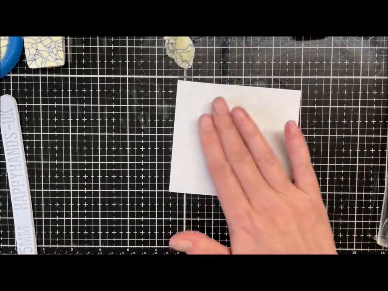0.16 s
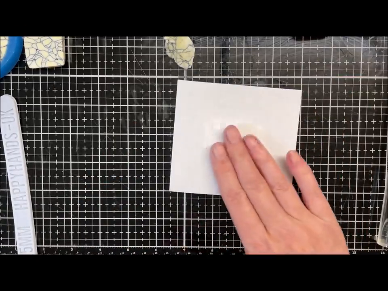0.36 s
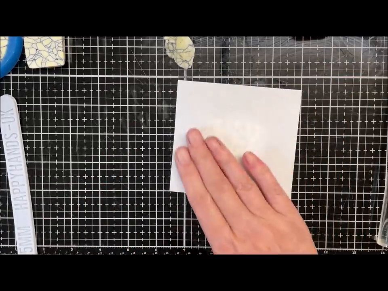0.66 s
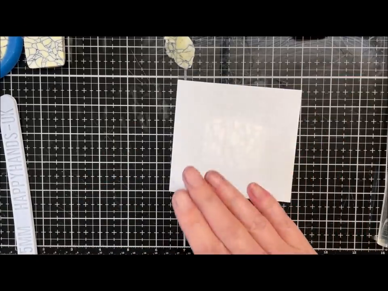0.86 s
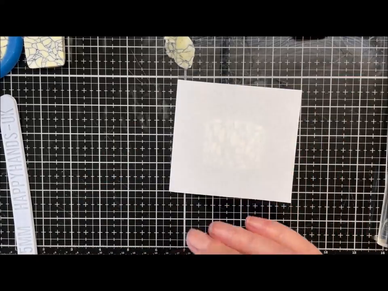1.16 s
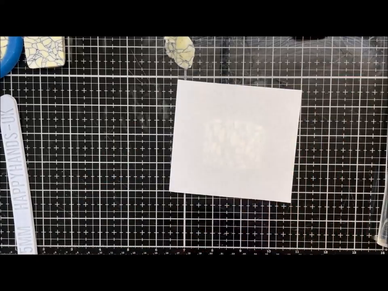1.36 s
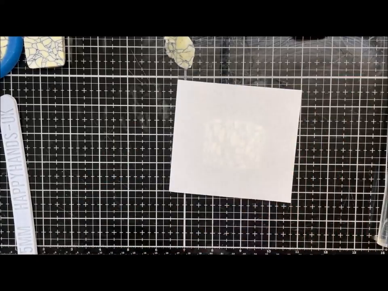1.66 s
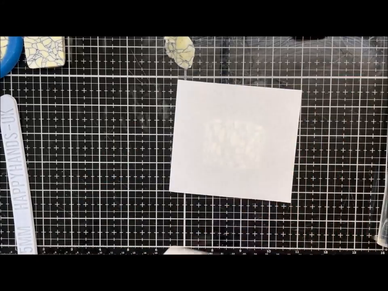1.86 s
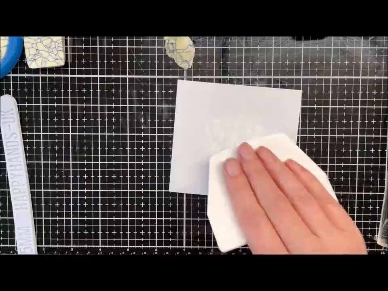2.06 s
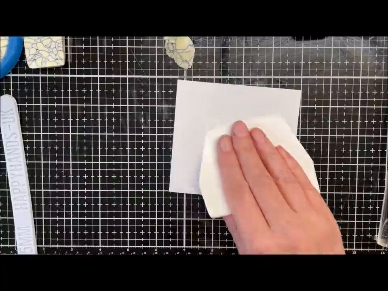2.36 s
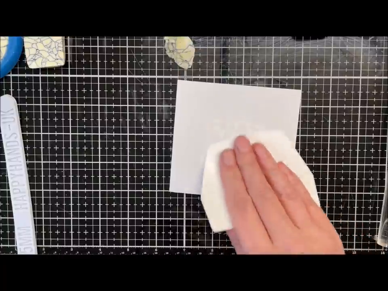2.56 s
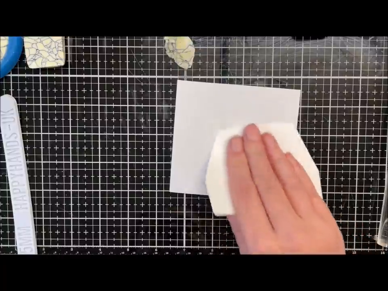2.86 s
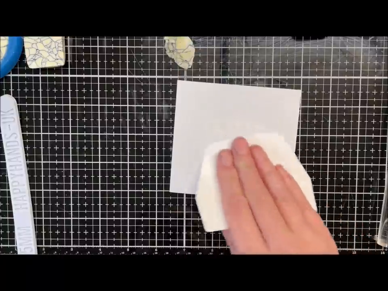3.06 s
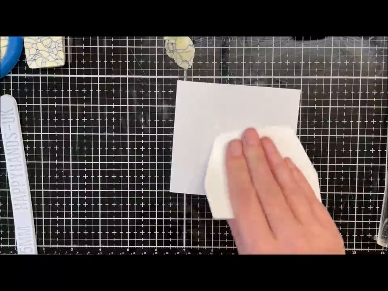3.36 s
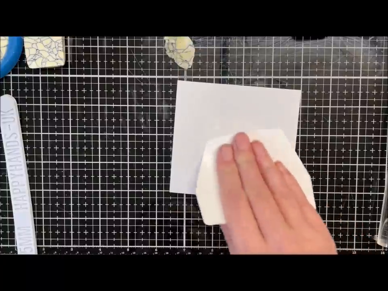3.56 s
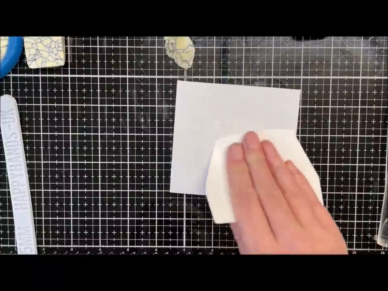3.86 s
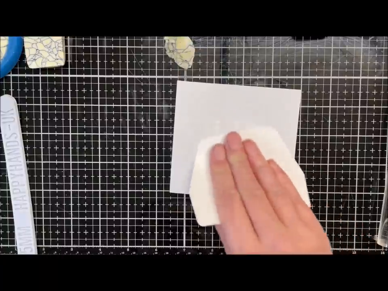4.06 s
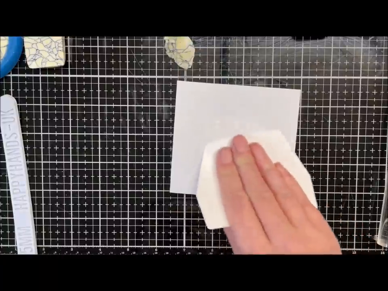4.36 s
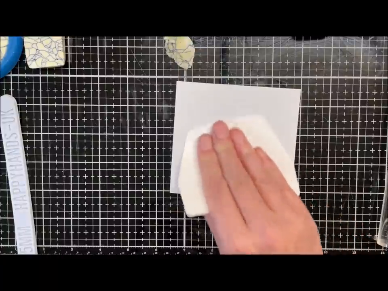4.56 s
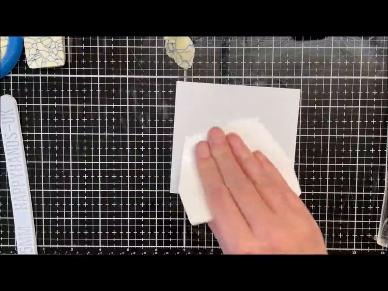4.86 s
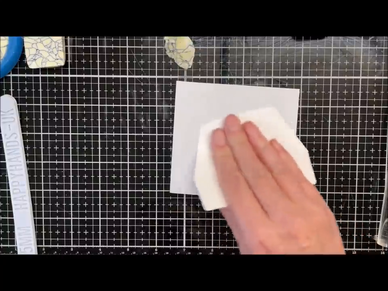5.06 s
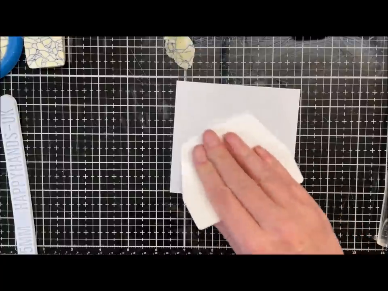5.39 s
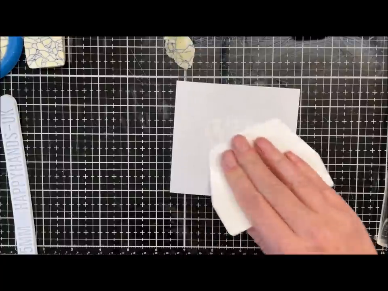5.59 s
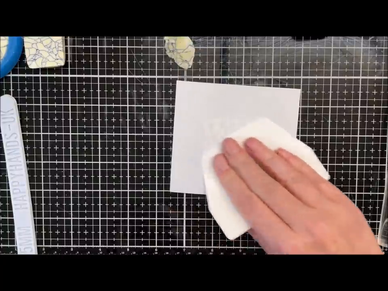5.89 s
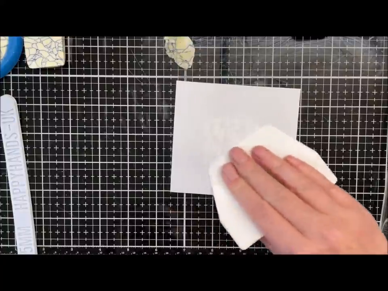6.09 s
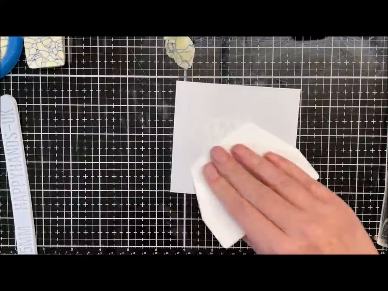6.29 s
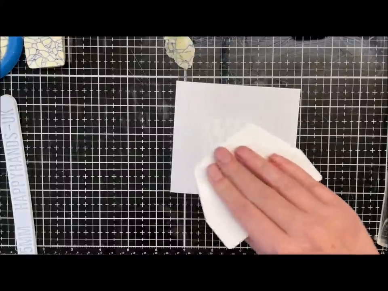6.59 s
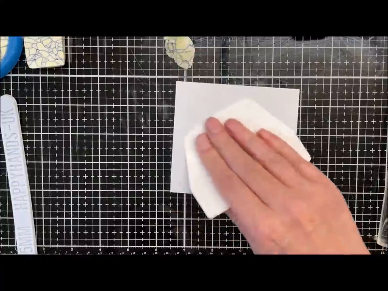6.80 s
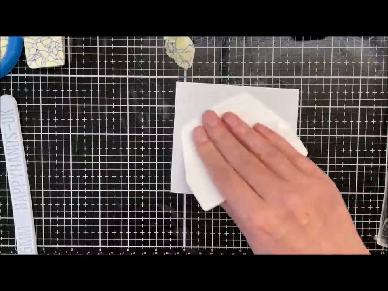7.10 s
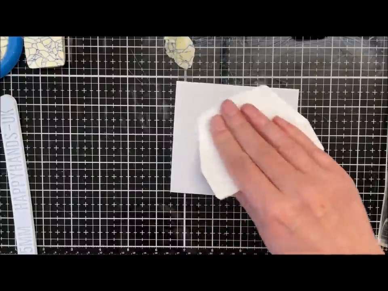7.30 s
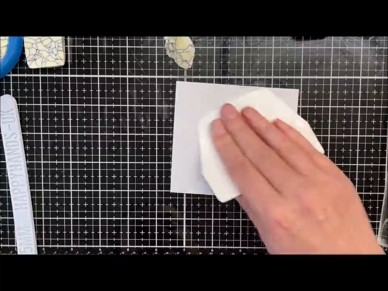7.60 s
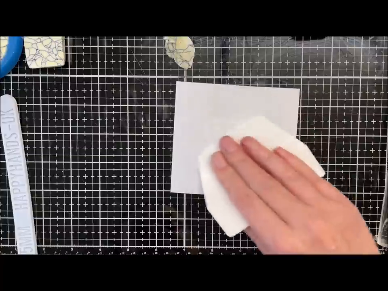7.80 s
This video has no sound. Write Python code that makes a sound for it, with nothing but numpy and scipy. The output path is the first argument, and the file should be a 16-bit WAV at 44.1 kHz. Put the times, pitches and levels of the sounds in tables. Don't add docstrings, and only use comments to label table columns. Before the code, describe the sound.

Bare fingers brush paper, slide off onto a mat, then folded tissue rubs the sheet in hissing circles and quick squeaky wipes, with desk knocks.

```python
import sys
import numpy as np
from scipy import signal
from scipy.fft import rfft, irfft, next_fast_len
from scipy.io import wavfile
from scipy.ndimage import uniform_filter1d

SR = 44100
rng = np.random.default_rng(int(sys.argv[2]) if len(sys.argv) > 2 else 0)


def wav_record(signal):
    frames = np.transpose(np.atleast_2d(signal))
    bounded = np.clip(frames, -1, 1)
    quanta = np.round(bounded * 32767).astype(np.int16)
    wavfile.write(sys.argv[1], SR, quanta)


def undo_db(level):
    steps = np.asarray(level, float) / 20
    return 10 ** steps


N = 350154


def evened(x):
    return x / np.sqrt(np.mean(x ** 2) + 1e-20)


def drifting(size):
    once = uniform_filter1d(rng.standard_normal(N), size=size)
    return evened(uniform_filter1d(once, size=size))


def coloured(x, points):
    size = next_fast_len(len(x))
    hz, db = np.transpose(points)
    log_hz = np.log(np.fft.rfftfreq(size, 1 / SR) + 1)
    shape_db = np.interp(log_hz, np.log(hz + 1), db, left=-100, right=-100)
    return evened(irfft(rfft(x, size) * undo_db(shape_db), size)[:len(x)])


def resonate(x, hz, width):
    turn = np.exp(2j * np.pi * np.cumsum(hz * np.ones(len(x))) / SR)
    r = np.exp(-np.pi * width / SR)
    smooth = signal.lfilter([(1 - r) ** 2], [1, -2 * r, r * r], x / turn + 1e-18)
    return 2 * (turn * smooth).real


def ring(x, modes, drift=0.):
    return sum(undo_db(db) * evened(resonate(x, hz * (1 + drift), width)) for hz, width, db in modes)


def level_curve(rows):
    s, db = np.transpose(rows)
    t = np.arange(N) / SR
    outside_s = np.maximum(s[0] - t, 0) + np.maximum(t - s[-1], 0)
    return undo_db(np.interp(t, s, db) - 1000 * outside_s)


def bumps(rows):
    t, out = np.arange(N) / SR, np.zeros(N)
    for s, length, db in rows:
        at = slice(max(round((s - length / 2) * SR), 0), round((s + length / 2) * SR))
        out[at] += undo_db(db) * np.cos(np.pi * (t[at] - s) / length) ** 2
    return out


def room():
    # hz, db_per_hz
    tone_spectrum = [(53, -15.5), (90, -4.5), (168, -5.5), (223, -16.5), (308, -18), (343, -18.5),
                     (550, -21), (964, -27.5), (1030, -25.5), (1200, -26), (2100, -30), (2330, -32.5),
                     (15600, -40)]
    # hz, width_hz, level_db
    fan_band = [(166.9, 17.5, -71.5)]
    # hz, width_hz, level_db
    hum_band = [(119.7, 12.7, -71.5)]
    # time_s, level_db
    swell = [
        (0, 0),
        (2.5, 6.5),
        (3.5, 6.5),
        (4.4, -12),
        (5.4, -1),
        (7.94, -8),
    ]
    fan_hz, fan_db = 300.5, -76
    waver = evened(resonate(rng.standard_normal(N), fan_hz, width=9.5))
    tone = undo_db(fan_db) * (np.sin(2 * np.pi * fan_hz * np.arange(N) / SR) + 0.25 * waver)
    air = rng.standard_normal(N)
    bands = level_curve(swell) * ring(air, fan_band) + ring(air, hum_band)
    return undo_db(-65) * coloured(rng.standard_normal(N), tone_spectrum) + bands + tone


def building_drone():
    # middle_s, length_s, level_db
    swells = [(.37, 0.76, -50), (1.1, 1.3, -55), (1.9, 1.34, -51), (2.6, 0.67, -59), (3.5, 1.4, -53),
              (4.2, 1.05, -53), (5.1, 1.2, -57), (6.0, 1.0, -60), (6.95, 1.8, -58)]
    hz, floor_db = 44.48, -74.5
    fuzz = evened(resonate(rng.standard_normal(N), hz, width=10.6))
    tone = np.sin(2 * np.pi * hz * np.arange(N) / SR)
    return (undo_db(floor_db) + bumps(swells)) * (tone + 0.28 * fuzz)


def stand():
    # hz, width_hz, level_db
    tremor = [(7.34, 3.13, -44.5), (17.39, 2.92, -49), (79.4, 24, -67)]
    # start_s, peak_db, swing_hz, length_s
    sways = [
        (1.863, -26.5, 8, 0.856),
        (3.018, -19.5, 7.5, 0.6),
        (4.575, -27.5, 7.6, .5),
        (5.7, -36, 7.9, 0.45),
    ]
    out, t = ring(rng.standard_normal(N), tremor), np.arange(N) / SR
    for s, db, hz, length in sways:
        u = np.clip((t - s) / length, 0, 1)
        swing = np.minimum(u / 0.082, 1) * undo_db(-7 * u) * np.minimum((1 - u) / 0.21, 1)
        out -= undo_db(db) * swing * np.sin(2 * np.pi * hz * (t - s))
    return out


def desk():
    # middle_s, length_s, rumble_db
    leans = [(1.1, 2.3, -74), (1.77, 0.35, -59), (2.45, 0.61, -61.5), (2.9, 0.5, -54), (3.14, 0.14, -49.5),
             (4.6, 0.13, -51.5), (4.82, 0.17, -52), (5.2, 0.36, -59.5), (5.74, 0.4, -59), (6.01, 0.3, -51),
             (6.6, 1.15, -62.5), (6.99, 0.26, -63), (7.37, 0.13, -74), (7.58, 0.19, -60.5)]
    # hz, db_per_hz
    rumble_spectrum = [(16, -37), (28, -9), (38, -4), (92, -22), (160, -28.5), (210, -46.5), (350, -120)]
    # hz, width_hz, level_db
    boom = [(327, 88, 2.5), (371, 64, 2), (460, 130, -2), (630, 390, 0), (1020, 710, -5)]
    # start_s, length_s, boom_db, fade_db, rise_s
    drags = [
        (1.604, 0.68, -66.5, -1.5, 0.017),
        (3.12, 0.47, -57.5, -30, 0.012),
        (3.853, 0.67, -60, -5.5, 0.092),
    ]
    t = np.arange(N) / SR
    pressure = undo_db(-67.5) + bumps(leans)
    rumble = undo_db(4.5) * pressure * coloured(rng.standard_normal(N), rumble_spectrum)
    drag = np.zeros(N)
    for s, length, db, fade_db, rise in drags:
        gate = np.clip(np.minimum(t - s, s + length - t) / rise, 0, 1)
        drag += undo_db(db + fade_db * (t - s) / length) * gate
    return rumble + drag * evened(ring(rng.standard_normal(N), boom))


def knocks():
    # start_s, tick_db, thud_db, thud_hz, thud_t60_s
    blows = [(1.05, -57, -54, 197, 0.052), (1.4725, -50, -39.5, 320, 0.054),
             (1.618, -54, -45.5, 332, 0.038), (1.774, -73, -52.5, 171, 0.14),
             (1.821, -68, -47.5, 170, 0.08), (1.905, -66, -52, 200, 0.036), (2.425, -62, -47, 194, 0.082),
             (2.8, -75, -53, 250, 0.13), (2.94, -55, -47.5, 267, 0.045), (3.012, -50, -47, 317, 0.049),
             (3.1282, -34.5, -29, 126, 0.023), (3.541, -72, -48.5, 203, 0.033),
             (4.578, -69, -52.5, 141, 0.22), (5.959, -68, -52, 149, 0.063), (7.459, -55, -54, 604, .04)]
    # hz, level_db, t60_s
    tick_modes = [(712, 0.5, 0.055), (1055, 7, 0.026), (1240, 8.5, 0.01), (1470, -5, 0.05),
                  (2100, 10, 0.012), (2700, 1, 0.01)]
    length = 6000
    out, t = np.zeros(N + length), np.arange(length) / SR
    hz, db, t60 = np.transpose(tick_modes)[:, :, None]
    soft = 1 - np.exp(-t / 0.00025)
    modes = undo_db(db - 60 * t / t60) * np.sin(2 * np.pi * hz * t) * soft
    modes = signal.lfilter(*signal.butter(2, 560, "highpass", fs=SR), modes)
    uneven = undo_db(0.87 * rng.standard_normal((len(blows), len(tick_modes))))
    noise = rng.standard_normal((len(blows), length))
    puffs = evened(signal.lfilter(*signal.butter(2, [110, 400], "bandpass", fs=SR), noise))
    for (s, tick_db, thud_db, thud_hz, thud_t60), share, puff in zip(blows, uneven, puffs):
        push = undo_db(thud_db - 60 * t / thud_t60) * (1 - np.exp(-t / 0.0011))
        thud = push * (np.sin(2 * np.pi * thud_hz * t) + 0.38 * puff)
        out[round(s * SR):][:length] -= thud + undo_db(tick_db - 12) * (share @ modes)
    return out[:N]


def snaps():
    # start_s, peak_db, hz
    crisp = [(1.5948, -56, 1680), (1.6084, -57, 1630), (1.6192, -55, 1200), (1.7744, -61, 1600),
             (1.822, -57, 2890), (1.9011, -54.5, 1280), (2.222, -59, 1200), (2.2338, -49, 1490),
             (2.3955, -61, 1230), (2.4102, -57, 1320), (7.4589, -40.5, 3050)]
    length, t60_s, trim_db = 1500, .016, -1
    out, t = np.zeros(N + length), np.arange(length) / SR
    for (s, db, hz), crackle in zip(crisp, rng.standard_normal((len(crisp), length))):
        burst = np.sin(2 * np.pi * hz * t) + 0.49 * evened(resonate(crackle, 1.08 * hz, width=2500))
        out[round(s * SR):][:length] += undo_db(db + trim_db - 60 * t / t60_s) * burst
    return out[:N]


def grit(grain_db, flicker_db, patchy_db):
    clicks = rng.standard_normal(N) * undo_db(grain_db * np.minimum(rng.exponential(1, N), 5))
    z = signal.stft(clicks * undo_db(flicker_db * drifting(400)), nperseg=512)[2]
    patches = uniform_filter1d(rng.standard_normal(z.shape), size=6, axis=0)
    patches = uniform_filter1d(patches, size=6, axis=1)
    return evened(signal.istft(z * undo_db(patchy_db * evened(patches)), nperseg=512)[1][:N])


def rub(hiss_gain, ring_gain, colour, modes, slips):
    return hiss_gain * coloured(slips, colour) + ring_gain * evened(ring(slips, modes))


def squeaks():
    # start_s, length_s, hz, level_db
    pocket = [(1.588, 0.037, 1640, -65), (1.616, .01, 2780, -67), (1.625, 0.0093, 2450, -73),
              (1.596, .03, 1200, -68), (1.474, 0.016, 1520, -63), (2.277, 0.036, 1530, -64),
              (2.4, .03, 2770, -69), (1.618, 0.0076, 3120, -66), (2.232, 0.018, 1420, -65),
              (2.74, 0.06, 4020, -67), (2.796, .066, 3700, -63), (2.929, 0.042, 510, -63.5),
              (3.025, .086, 3650, -64), (3.285, 0.1, 3840, -65), (3.524, 0.11, 4130, -66),
              (3.77, 0.082, 4170, -71), (4.052, .046, 4200, -71), (4.391, 0.03, 4300, -61),
              (4.59, .12, 4300, -59), (4.903, 0.046, 4230, -56.5), (4.904, 0.045, 3030, -65),
              (4.905, 0.01, 2460, -52), (5.19, 0.043, 3600, -67), (7.438, 0.19, 5500, -67.5),
              (7.454, .006, 3100, -60)]
    # start_s, length_s, hz, level_db
    thumps = [(.6, 0.076, 200, -68.5), (2.408, 0.047, 420, -67.5), (2.408, .04, 550, -71),
              (2.72, 0.12, 200, -65.5), (4.558, 0.055, 250, -66), (4.56, 0.072, 616, -70),
              (4.795, .06, 225, -68), (5.936, .05, 477, -69), (5.936, .05, 650, -70.5),
              (6.22, 0.057, 250, -71.5), (7.08, .06, 303, -68), (7.394, 0.065, 215, -68)]
    # start_s, length_s, hz, level_db
    streaks = [(.685, 0.03, 1900, -60), (.72, .036, 1880, -65.5), (1.1, .026, 1200, -65),
               (1.102, .022, 1750, -62.5), (1.1, .03, 3180, -70), (1.11, 0.032, 785, -60.5),
               (1.128, .045, 1620, -69), (1.158, .045, 786, -64), (1.172, 0.048, 1160, -62.5),
               (1.165, 0.066, 3170, -70), (1.198, 0.016, 3600, -69), (1.192, .025, 3900, -69)]
    # start_s, length_s, hz, level_db, end_over_start_pitch
    glides = [(2.399, 0.062, 493, -68, 1.72), (4.642, 0.041, 3000, -59, 1.3),
              (6.128, 0.056, 2550, -64.5, 1.14), (6.82, 0.037, 2670, -61.5, 1.55),
              (7.05, .11, 3000, -62.5, 1.28), (7.135, 0.17, 2900, -60, 1.57), (7.163, 0.13, 2130, -66, 1.3),
              (7.388, 0.034, 2900, -60.5, 1.55), (7.44, .12, 3240, -58.5, 0.73),
              (7.486, 0.088, 2980, -56.5, 1.45), (7.68, 0.032, 3050, -60, 1.4),
              (7.724, 0.12, 2900, -62, 1.2), (7.804, .055, 3300, -61.5, 1.3)]
    out, slips = np.zeros(N), grit(grain_db=3.5, flicker_db=2.5, patchy_db=1.0)
    events = [(*r, 1, .17) for r in pocket + thumps]
    events += [(*r, 1, .05) for r in streaks]
    events += [(*r, .26) for r in glides]
    for s, length, hz, db, glide, width in events:
        at = slice(round(s * SR), round((s + length) * SR))
        u = np.linspace(0, 1, len(out[at]))
        shape = np.minimum(6 * u, 1) * np.minimum(3 * (1 - u), 1)
        out[at] += undo_db(db) * shape * evened(resonate(slips[at], hz * (1 + (glide - 1) * u), width * hz))
    return out


def fingers(slips):
    # time_s, level_db
    pressure = [
        (0.0, -66.5),
        (0.098, -69),
        (0.212, -64.5),
        (0.344, -63.5),
        (0.51, -70),
        (0.706, -60),
        (0.77, -60.5),
        (0.828, -71),
        (0.87, -93),
    ]
    # hz, db_per_hz
    skin = [(290, -20), (500, -16), (612, -33), (716, -20.5), (1240, -18.5), (1650, -24), (1850, -19),
            (2500, -15), (2850, -15.5), (5770, -13), (15600, -18.5)]
    # hz, width_hz, level_db
    modes = [(1820, 660, 2.5), (1490, 200, -2)]
    touch = level_curve(pressure)
    return rub(undo_db(1.0) * touch, undo_db(-11.5) * touch, skin, modes, slips)


def slide_off():
    # middle_s, length_s, hiss_db
    catches = [
        (1.056, .04, -72),
        (1.106, 0.054, -60.5),
        (1.155, 0.2, -62.5),
        (1.203, 0.048, -61.5),
        (1.24, 0.083, -73.5),
    ]
    # middle_s, length_s, ring_db
    bows = [
        (1.165, 0.18, -61),
    ]
    # hz, db_per_hz
    mat = [(290, -17), (500, -16), (569, -34), (770, -13), (889, -11), (1150, -13), (1350, -11),
           (3150, -15), (15600, -27.5)]
    # hz, width_hz, level_db
    modes = [(790, 73, 2.5), (1170, 78, 7), (1670, 150, -7), (2660, 210, -13), (3100, 200, -2)]
    slips = grit(grain_db=3.0, flicker_db=1.5, patchy_db=1.0)
    return rub(undo_db(1.0) * bumps(catches), undo_db(-5) * bumps(bows), mat, modes, slips)


def folding(slips):
    # middle_s, length_s, level_db
    folds = [
        (1.48, 0.089, -75.5),
        (1.59, 0.29, -73),
        (1.63, 0.041, -78),
        (1.78, 0.078, -69.5),
        (1.83, 0.095, -72.5),
        (1.908, 0.066, -71),
        (2.03, 0.44, -77),
        (2.228, 0.094, -75.5),
    ]
    # hz, db_per_hz
    crease = [(290, -36), (500, -7), (1060, -8), (1390, -23), (1650, -7), (1820, -13), (3060, -13.5),
              (4580, -19), (15600, -27)]
    # hz, width_hz, level_db
    modes = [(1650, 490, 5), (1200, 100, -5)]
    creases = bumps(folds)
    return rub(undo_db(3.0) * creases, undo_db(-17) * creases, crease, modes, slips)


def tissue(slips):
    # middle_s, length_s, speed_db
    strokes = [(2.307, 0.1, -74), (2.49, 0.2, -73.5), (2.606, 0.14, -68), (2.75, 0.21, -75.5),
               (2.87, 0.38, -69), (3.03, 0.25, -74.5), (3.14, 0.22, -71), (3.283, 0.14, -71),
               (3.39, .15, -69), (3.49, 0.18, -69.5), (3.67, 0.41, -72.5), (3.8, 0.12, -77),
               (3.92, 0.28, -71), (4.15, 0.47, -73), (4.314, 0.1, -74), (4.45, 0.14, -72.5),
               (4.673, 0.45, -69), (4.915, 0.5, -73),
               (5.056, 0.14, -70), (5.205, 0.21, -68.5), (5.325, 0.094, -69), (5.488, 0.21, -72),
             (5.618, 0.12, -68), (5.778, 0.19, -71), (5.914, 0.2, -74), (6.045, 0.15, -71),
             (6.172, 0.095, -71), (6.316, 0.23, -76), (6.455, 0.19, -78), (6.603, 0.15, -71),
             (6.706, 0.15, -74.5), (6.842, 0.2, -72), (7.02, 0.26, -71.5), (7.177, 0.27, -72),
             (7.33, 0.27, -73.5), (7.489, 0.16, -66.5), (7.606, 0.22, -69.5), (7.746, 0.21, -69.5),
             (7.92, 0.4, -67)]
    # middle_s, hiss_db, ring_db
    pushes = [(2.26, -90, -66.5), (2.8, -86, -88), (3.05, -67, -80), (3.33, -73, -83), (3.596, -67, -77),
              (3.845, -70.5, -92), (4.069, -66.5, -86), (4.374, -68.5, -84), (4.66, -72, -72),
              (4.92, -74, -83), (5.611, -89, -66), (5.88, -71.5, -68), (6.165, -73, -71), (6.44, -100, -81),
              (6.7, -98, -72), (6.84, -77, -89), (7.19, -63.5, -74), (7.465, -60, -79), (7.77, -64, -76)]
    # time_s, ring_db
    press = [
        (2.4, -75),
        (3.0, -64.5),
        (3.2, -65.5),
        (4.9, -70),
        (7.94, -66),
    ]
    # hz, db_per_hz
    fibres = [(7000, -30), (8800, -9), (10300, -1.5), (12500, 0), (15900, -3)]
    # hz, db_per_hz
    hiss_spectrum = [(290, -41), (500, -14), (980, -14), (1230, -10), (1340, -4), (1500, -4), (2120, -7.5),
                     (2930, -3), (3800, -6.5), (6500, -9.5), (8600, -12.5), (10300, -23), (12500, -45)]
    # hz, width_hz, level_db
    sheet_modes = [(632, 19, -5.5), (1364, 61, 0), (1490, 64, 2.5), (1660, 21, -7), (1860, 90, -6),
                   (2416, 76, -5.5), (2900, 410, -2), (2837, 83, -1), (2968, 70, -2), (3060, 69, -7),
                   (3215, 45, -8), (3430, 50, -3), (3612, 42, -2.5), (4146, 62, -7.5)]
    lands_s, rests_s, firm_s, settle_s, push_s = 2.19, 2.42, 2.7, 0.052, 0.19
    lift_db, turn_db, hiss_db = -110.5, -82, -66.5
    t = np.arange(N) / SR
    down, rests = (np.clip((t - s) / settle_s, 0, 1) for s in (lands_s, rests_s))
    speed = bumps(strokes) + undo_db(lift_db) + undo_db(turn_db) * rests
    fizz = undo_db(0.55) * down * speed * coloured(slips, fibres)
    grip_db = np.interp(t, [rests_s, firm_s], [-2.5, 0])
    steady = undo_db(hiss_db + grip_db) * down * (speed / undo_db(hiss_db)) ** 0.35
    push_hiss = bumps([(s, push_s, db - 6.5) for s, db, _ in pushes])
    hiss = undo_db(5.5) * (steady + push_hiss) * coloured(slips, hiss_spectrum)
    bend = .004 * drifting(5000)
    weight = level_curve(press) + bumps([(s, push_s, db) for s, _, db in pushes])
    return fizz + hiss + undo_db(-5.5) * weight * evened(ring(slips, sheet_modes, bend))


def hand():
    slips = grit(grain_db=1.5, flicker_db=-0.5, patchy_db=1.77)
    return fingers(slips) + slide_off() + folding(slips) + tissue(slips) + squeaks()


def near(x):
    t60_s, wet = .12, undo_db(-13)
    at = np.arange(200, 7000, 20)
    taps = np.zeros(7020)
    signs = rng.choice([-1., 1.], len(at))
    taps[at + rng.integers(0, 20, len(at))] = signs * undo_db(-60 * at / SR / t60_s)
    echoes = signal.oaconvolve(x, taps / np.linalg.norm(taps))[:N]
    return (x + wet * echoes) / np.sqrt(1 + wet ** 2)


def scene():
    background = room() + building_drone() + stand() + desk() + knocks()
    return (near(hand() + snaps()) + background)[None]


def dropouts(x):
    # middle_s, length_s, lowest_hz
    starved = [(.373, .012, 600), (.618, .030, 500), (.907, .013, 1800), (1.080, .018, 2500),
               (1.271, .015, 1800), (1.650, .015, 2200), (1.697, .013, 2500), (1.760, .012, 2500),
               (2.233, .017, 3800), (2.422, .011, 800), (2.530, .014, 800), (3.537, .015, 1900),
               (4.513, .014, 800), (4.897, .012, 1500), (5.281, .011, 1500), (5.644, .012, 800),
               (5.692, .017, 600), (6.224, .015, 600), (6.348, .011, 800), (6.475, .011, 800),
               (6.539, .013, 1500), (6.924, .011, 1800), (7.094, .012, 3500), (7.409, .015, 600)]
    out, taper = x.copy(), np.hanning(2048) + 0.00073
    hz, t = np.fft.rfftfreq(2048, 1 / SR), (np.arange(2048) - 1024) / SR
    for s, length, low_hz in starved:
        at = slice(round(s * SR) - 1024, round(s * SR) + 1024)
        z = rfft(out[0, at] * taper) * (hz > low_hz)
        power = abs(z) ** 2
        strong = power > 2.9 * (1 + (hz / 8500) ** 4) * uniform_filter1d(power, size=61)
        inside = np.clip(np.minimum((length / 2 + t) / .006, (length / 2 - t) / .001) + .5, 0, 1)
        around = np.clip((length / 2 + .012 - abs(t)) / .006, 0, 1) * (taper > .1)
        out[0, at] += (.6 * around * irfft(z * strong) - inside * irfft(z * ~strong)) / taper
    return out


def band_limit(x):
    return signal.sosfilt(signal.butter(12, 15710, fs=SR, output="sos"), x)


def record(dry):
    out = dropouts(dry)
    out *= np.minimum((N - np.arange(N)) / 400, 1)
    return band_limit(out)


dry = scene()
out = record(dry)
wav_record(out)
```